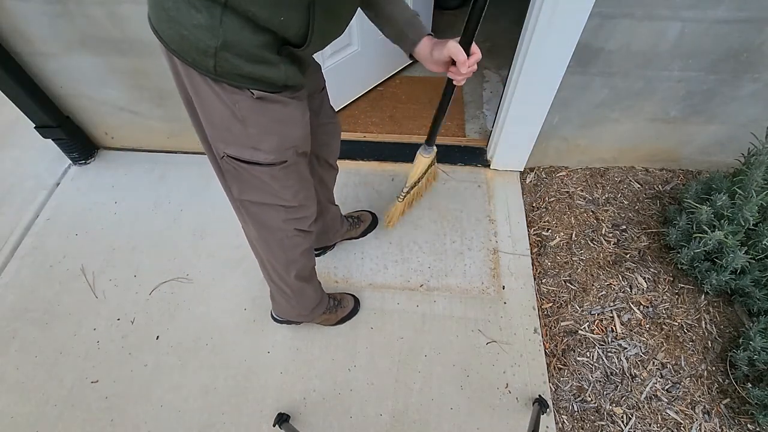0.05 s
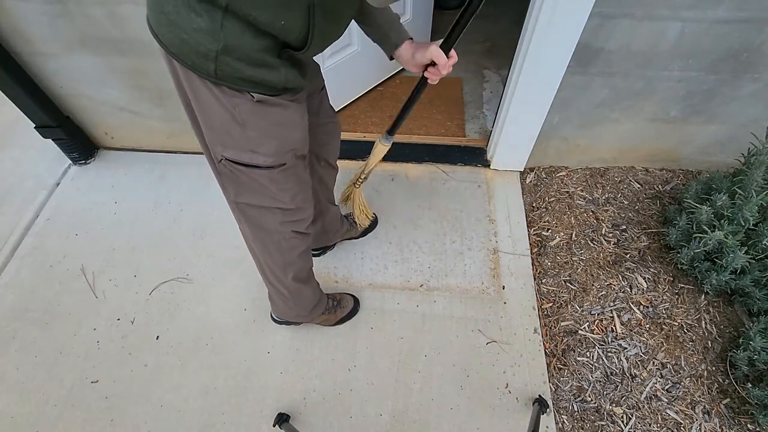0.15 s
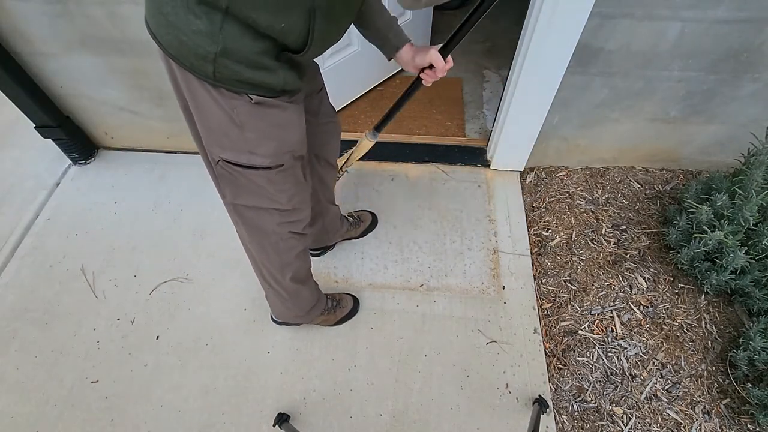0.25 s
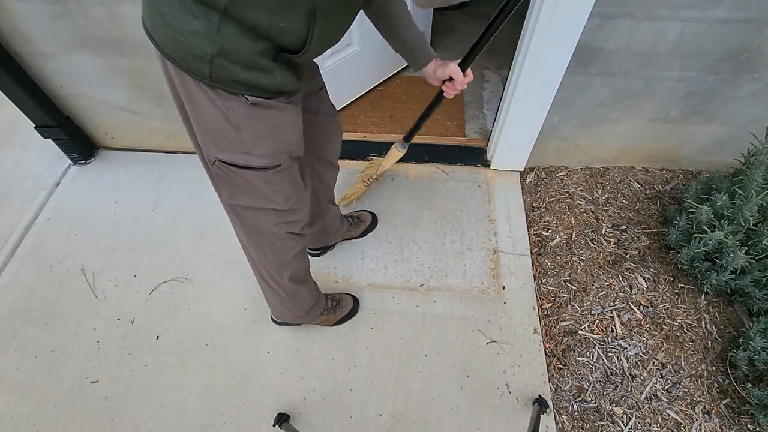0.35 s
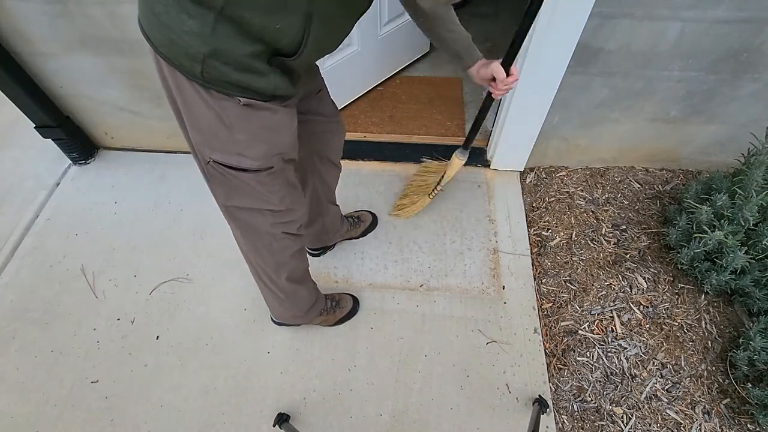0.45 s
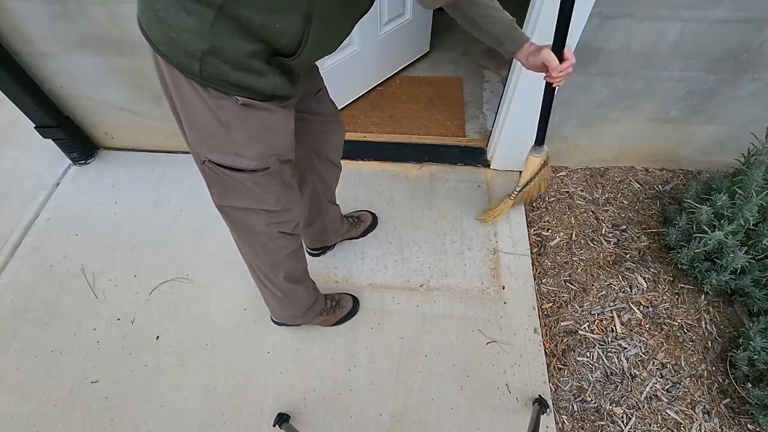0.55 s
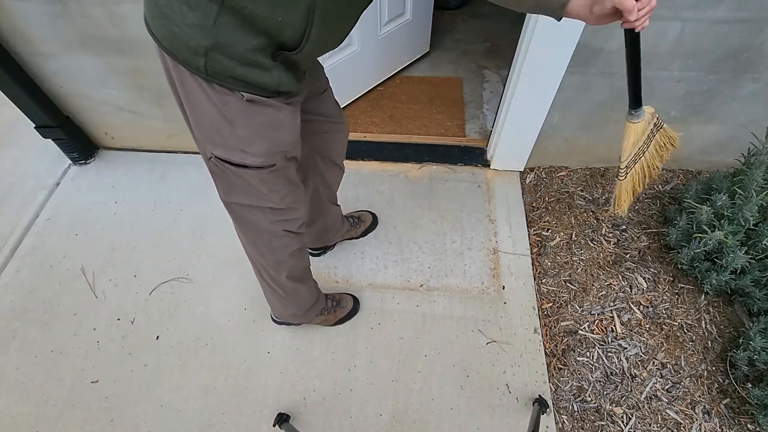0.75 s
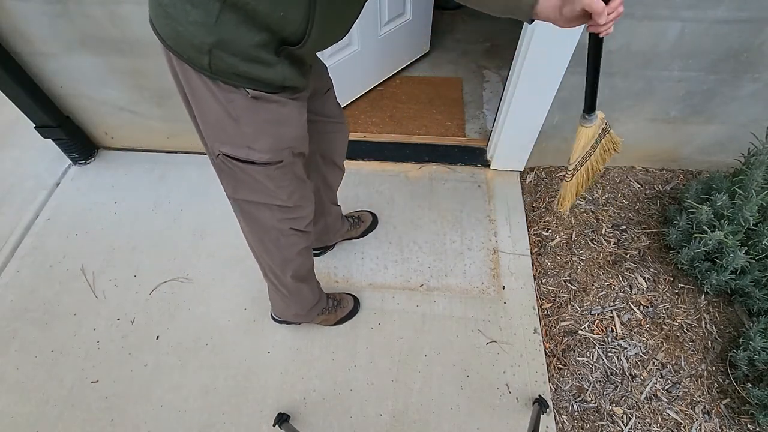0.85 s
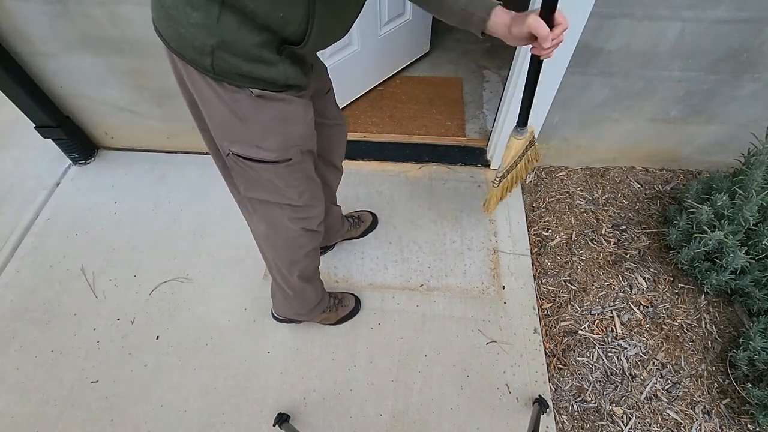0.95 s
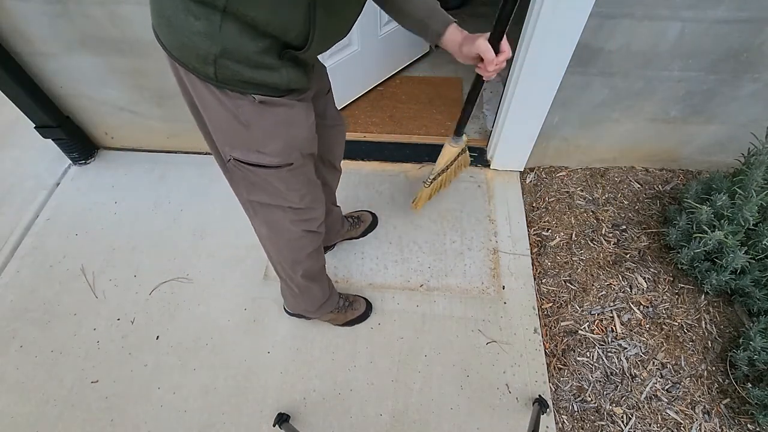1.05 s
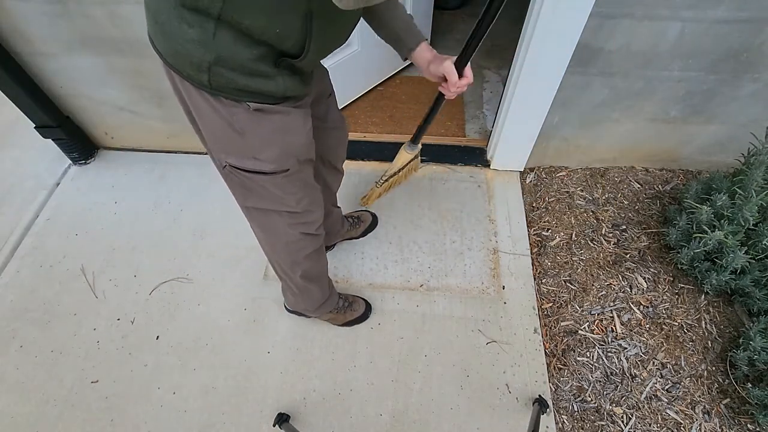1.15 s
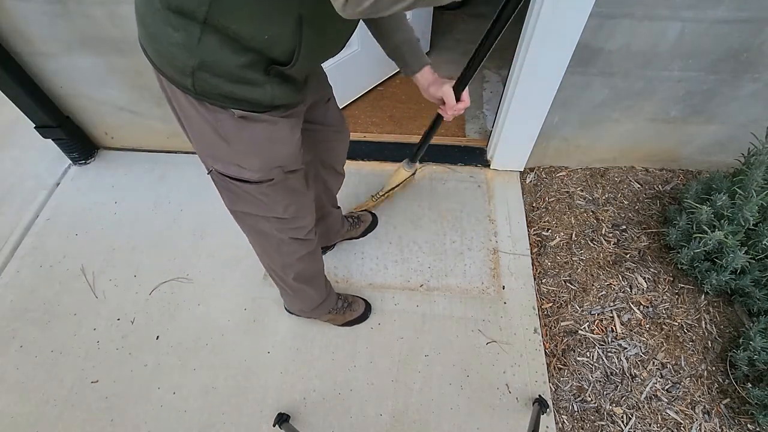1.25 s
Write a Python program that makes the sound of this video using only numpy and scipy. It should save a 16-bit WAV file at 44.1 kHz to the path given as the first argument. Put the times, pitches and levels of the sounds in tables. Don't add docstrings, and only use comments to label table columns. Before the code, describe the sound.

A straw broom sweeps a concrete doorstep, close and bright. Faint grit ticks come first, then a light scratchy swish from 0.13 to 0.36 seconds. A much louder, harsh stroke lands with a dull knock near 0.39 and rasps until 0.63, with a short diffuse tail. Small ticks follow at 0.78, a faint landing tap at 1.1, and a new brush begins at 1.29. A low distant engine idles beneath.

```python
import sys
import numpy as np
from scipy import signal
from scipy.fft import rfft, irfft
from scipy.io import wavfile
from scipy.ndimage import uniform_filter1d

SR = 44100
rng = np.random.default_rng(int(sys.argv[2]) if len(sys.argv) > 2 else 0)


def natural_amplitude(level_db):
    exponent = np.asarray(level_db, float) / 20
    return 10 ** exponent


def master(y):
    cut = np.clip(np.atleast_2d(y).T, -1, 1)
    pcm = np.round(cut * 32767)
    wavfile.write(sys.argv[1], SR, pcm.astype(np.int16))


N = 57330

# time_s, level_db, straw_bend_db
STROKES = [
    [(.118, -80, -7.5), (.129, -33.5, 11), (.136, -23, 2.5), (.18, -28, -6), (.206, -25, 3),
     (.27, -21, -2.5), (.32, -25.5, 2.5), (.345, -31.5, -5), (.362, -37, -13)],
    [(.367, -26, 0), (.379, -32.5, 2), (.394, -15.5, 2), (.436, -10.5, 3.5), (.53, -11, 3),
     (.602, -13.5, -3.5), (.65, -34.5, -2.5), (.72, -43, -2), (.8, -57.5, 0)],
    [(1.085, -60.5, -6), (1.1, -39.5, 0), (1.125, -56, 1.5), (1.2, -51, 5), (1.235, -47.5, 5),
     (1.282, -50, -2), (1.3, -23.5, 9)],
]
# freq_hz, level_db
SLIP_COLOUR = [(200, -21), (1000, -18), (2000, -11.5), (4200, -9), (6900, -6), (9000, -6), (10800, -10),
               (12400, -21.5)]
# freq_hz, width_hz, level_db
STRAW_MODES = [(5320, 800, -8), (8880, 1900, -5.5)]
# start_s, peak_db, ring_hz
GRIT_TICKS = [(.0635, -36, 8600), (.0702, -26, 8200), (.0762, -30, 8000), (.1578, -16, 8700),
              (.7830, -25, 5600), (.7832, -23, 8500), (.7845, -19, 8000), (.7880, -31, 7700),
              (.7914, -37, 7200), (1.1021, -30, 5000), (1.1075, -28, 9600), (1.1145, -32, 10000),
              (1.1335, -38, 4500), (1.163, -38, 8400), (1.226, -37, 7500)]
# start_s, peak_db, ring_hz
HEAD_THUDS = [
    (.133, -33.5, 805),
    (.135, -32, 299),
    (.367, -29.5, 415),
    (.392, -24, 497),
    (.396, -17.5, 1593),
    (.975, -40, 1200),
    (1.097, -39.5, 423),
    (1.099, -36.5, 1100),
    (1.1, -37.5, 2580),
]
# firing_rate_multiple, level_db
IDLE_HARMONICS = [(1, -58), (2, -41.5), (3, -41.5), (4, -49), (5, -52.5), (6, -59), (7, -60), (8, -64),
                  (9, -62)]
# time_s, level_db
IDLE_SWELL_DB = [(0, -2), (0.599, -5.5), (0.719, 0), (1.3, 0)]
# freq_hz, level_db
AIR_COLOUR = [(30, -12.5), (55, 1.5), (130, 2.5), (300, -17.5), (2000, -20), (4000, -24), (8500, -24.5),
              (11800, -36)]
# freq_hz, level_db
PORT_DIFFERENCE = [(60, -28), (300, -12), (700, -8), (2500, -9), (5000, -14), (10000, -12)]
# freq_hz, step_db
ROUNDING_STEP = [(110, -34), (180, -11), (800, -9), (1400, -17), (1900, -27), (3000, -30), (11900, -28),
                 (12600, -12)]

SLIPS_PER_S, SLIP_SPREAD_DB, SLIP_CAP_DB, RUB_DB = 11000, 2.7, 10, -3
PATCHY_DB, GRAINY_DB = .6, 1.0
GRIT_T60_S, GRIT_DB = .005, 0
THUD_T60_S, THUD_DB = .04, 0.5
PORCH_T60_S, PORCH_DB = 0.26, -12.5
IDLE_HZ, IDLE_WANDER_RATIO, IDLE_FLUTTER_DB, IDLE_SLIP_RAD = 34.1, 0.0071, 4, 0.81
AIR_DB, AIR_FLICKER_DB = -40.5, -1
PORT_LAG_S = 2.1e-5
KNEE_AMP, TOP_HZ = 1.5, 12500
BLOCK, BLOCK_START = 1024, 911
STEP_SCATTER_DB, STEP_LEAST_DB, ROUND_UP = 3.5, -55, .35
HUNGER_DB_PER_DB, HUNGRY_FROM_DB, HUNGRY_UNDER_HZ, SIDE_STEP_DB = .8, -22, 2500, -9
DEAF_OVER_HZ, DEAF_STEP_DB = 11300, -45


def colour(x, points):
    points_hz, points_db = np.array(points, float).T
    freq_hz = np.maximum(np.arange(1025) * SR / 2048, 1)
    response_db = np.interp(np.log(freq_hz), np.log(points_hz), points_db)
    cepstrum = irfft(response_db * np.log(10) / 20)
    cepstrum[1:1024] *= 2
    cepstrum[1025:] = 0
    impulse = irfft(np.exp(rfft(cepstrum)))
    return signal.fftconvolve(x, impulse)[:N]


def level(x, db):
    return x * natural_amplitude(db) / np.sqrt(np.mean(x ** 2))


def walk(rate_hz):
    hold = int(SR / rate_hz)
    steps = np.repeat(rng.standard_normal(N // hold + 1), hold)[:N]
    return 1.3 * uniform_filter1d(uniform_filter1d(steps, hold), hold)


def resonate(x, freq_hz, q):
    b, a = signal.iirpeak(freq_hz, q, SR)
    return signal.lfilter(b, a, x)


def rings(events, t60_s, relative_width):
    t_s = np.arange(4096) / SR
    out = np.zeros(N + len(t_s))
    decay = 1000. ** (-t_s / t60_s)
    for start_s, peak_db, ring_hz in events:
        burst = (rng.standard_normal(len(t_s)) + 1.3 * (t_s == 0)) * decay
        ring = resonate(resonate(burst, ring_hz, 1 / relative_width), ring_hz, 1 / relative_width)
        i = int(start_s * SR)
        out[i:i + len(t_s)] += natural_amplitude(peak_db) * ring / np.abs(ring).max()
    return out[:N]


def broom():
    t_s = np.arange(N) / SR
    time_s, pressure_db, straw_bend_db = np.concatenate(STROKES).T
    gain_db = np.interp(t_s, time_s, pressure_db) + PATCHY_DB * walk(30) + GRAINY_DB * walk(300)
    bend_db = np.interp(t_s, time_s, straw_bend_db)
    gain = natural_amplitude(gain_db)
    return gain * straw(bend_db), gain * straw(bend_db)


def straw(bend_db):
    direct = colour(slips(), SLIP_COLOUR)
    low, high = [level(resonate(direct, freq_hz, freq_hz / width_hz), db)
                 for freq_hz, width_hz, db in STRAW_MODES]
    return level(level(direct, 0) + natural_amplitude(bend_db) * low + high, 0)


def slips():
    released = rng.random(N) < SLIPS_PER_S / SR
    size_db = np.minimum(rng.exponential(size=N) * SLIP_SPREAD_DB, SLIP_CAP_DB)
    clicks = released * natural_amplitude(size_db) * rng.choice([-1, 1], N)
    rub = natural_amplitude(RUB_DB) * rng.standard_normal(N)
    return level(clicks, 0) + rub


def thuds():
    return natural_amplitude(THUD_DB) * rings(HEAD_THUDS, THUD_T60_S, .7)


def grit():
    return natural_amplitude(GRIT_DB) * rings(GRIT_TICKS, GRIT_T60_S, 0.31)


def porch(x):
    t_s = np.arange(SR // 2) / SR
    tail = rng.standard_normal(len(t_s)) * 1000. ** (-t_s / PORCH_T60_S) * (t_s > .004)
    tail = level(tail, 0) / np.sqrt(len(t_s))
    return signal.fftconvolve(x, tail)[:N] * natural_amplitude(PORCH_DB)


def engine():
    firing_hz = IDLE_HZ * (1 + IDLE_WANDER_RATIO * walk(5.9))
    phase_rad = 2 * np.pi * np.cumsum(firing_hz) / SR
    swell_db = np.interp(np.arange(N) / SR, *np.array(IDLE_SWELL_DB).T)
    out = np.zeros(N)
    for multiple, db in IDLE_HARMONICS:
        gain = np.sqrt(2) * natural_amplitude(db + swell_db + IDLE_FLUTTER_DB * walk(12))
        out += gain * np.sin(multiple * phase_rad + IDLE_SLIP_RAD * walk(10))
    return out


def air():
    wash = level(colour(rng.standard_normal(N), AIR_COLOUR), AIR_DB)
    return natural_amplitude(AIR_FLICKER_DB * walk(10.84)) * wash


def scene():
    sweep, sweep_apart = broom()
    near = sweep + grit() + thuds()
    mid = near + porch(near) + engine() + air()
    side = colour(sweep_apart + air() + porch(near), PORT_DIFFERENCE)
    freq_hz = np.arange(N // 2 + 1) * SR / N
    late = irfft(rfft(mid) * np.exp(-2j * np.pi * freq_hz * PORT_LAG_S), N)
    return np.array([late + side, mid - side])


def starve(mid_side):
    j, k = np.arange(2 * BLOCK), np.arange(BLOCK)
    window = np.sin(np.pi * (j + .5) / 2 / BLOCK)
    cosines = np.cos(np.pi / BLOCK * np.outer(k + .5, j + .5 + BLOCK / 2))
    basis = np.sqrt(2 / BLOCK) * window * cosines
    lead = 2 * BLOCK - BLOCK_START
    padded = np.pad(mid_side, ((0, 0), (lead, 2 * BLOCK)))
    starts = np.arange(0, padded.shape[1] - 2 * BLOCK, BLOCK)
    bins = padded[:, starts[:, None] + j] @ basis.T

    bin_hz = k * SR / 2 / BLOCK
    centre_hz = (k + .5) * SR / 2 / BLOCK
    points_hz, points_db = np.array(ROUNDING_STEP, float).T
    shape_db = np.interp(np.log(centre_hz), np.log(points_hz), points_db)
    scatter = rng.standard_normal((len(starts), BLOCK // 8))
    scatter_db = np.repeat(scatter, 8, axis=1) * STEP_SCATTER_DB
    loud = np.sqrt(np.mean(bins[0, :, 150:500] ** 2, axis=1, keepdims=True)) + natural_amplitude(STEP_LEAST_DB)
    excess_db = np.maximum(20 * np.log10(loud) - HUNGRY_FROM_DB, 0)
    hunger_db = HUNGER_DB_PER_DB * excess_db * (bin_hz < HUNGRY_UNDER_HZ)
    side_gain = np.array([1, natural_amplitude(SIDE_STEP_DB)])[:, None, None]
    step = loud * natural_amplitude(shape_db + scatter_db + hunger_db) * side_gain
    step = step + natural_amplitude(DEAF_STEP_DB + scatter_db) * (bin_hz > DEAF_OVER_HZ)

    rounded = np.sign(bins) * np.floor(np.abs(bins) / step + ROUND_UP) * step
    frames = rounded @ basis
    out = np.zeros_like(padded)
    for i, start in enumerate(starts):
        out[:, start:start + 2 * BLOCK] += frames[:, i]
    return out[:, lead:][:, :N]


def low_pass(x):
    return signal.sosfilt(signal.butter(12, 12170, fs=SR, output="sos"), x)


def record(dry):
    soft = KNEE_AMP * np.tanh(dry / KNEE_AMP)
    lowpass = signal.ellip(8, .3, 60, TOP_HZ, fs=SR, output="sos")
    left, right = signal.sosfilt(lowpass, soft)
    mid, side = starve(np.array([left + right, left - right]) / 2)
    mix = np.clip([mid + side, mid - side], -1, 1)
    return low_pass(mix)


dry = scene()
out = record(dry)
master(out)
```